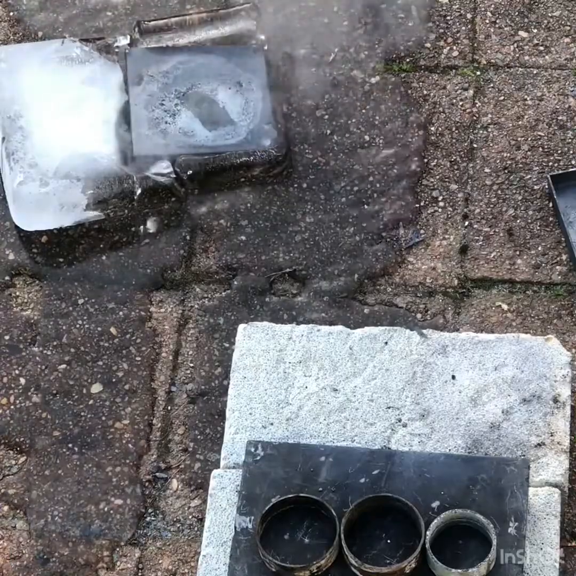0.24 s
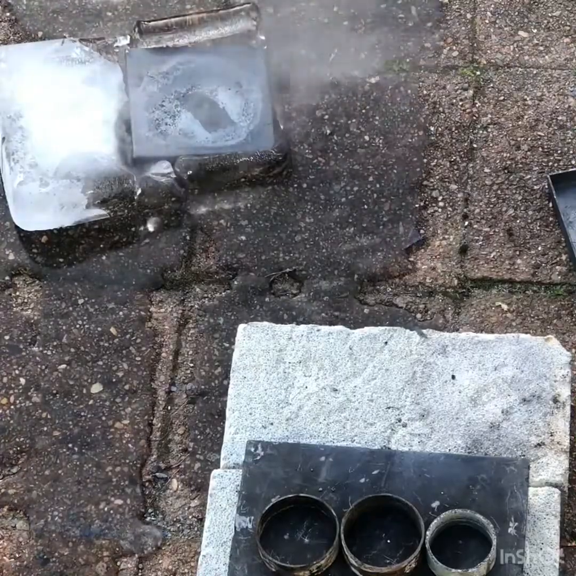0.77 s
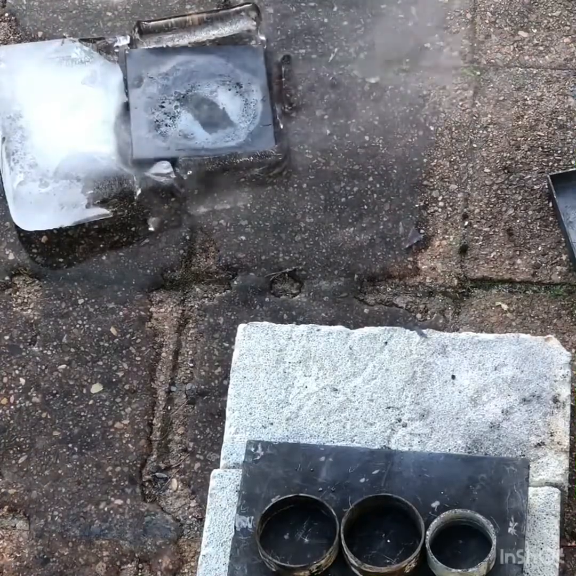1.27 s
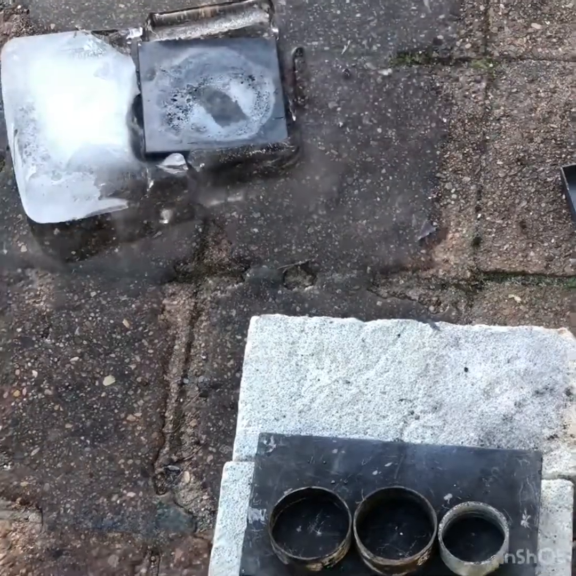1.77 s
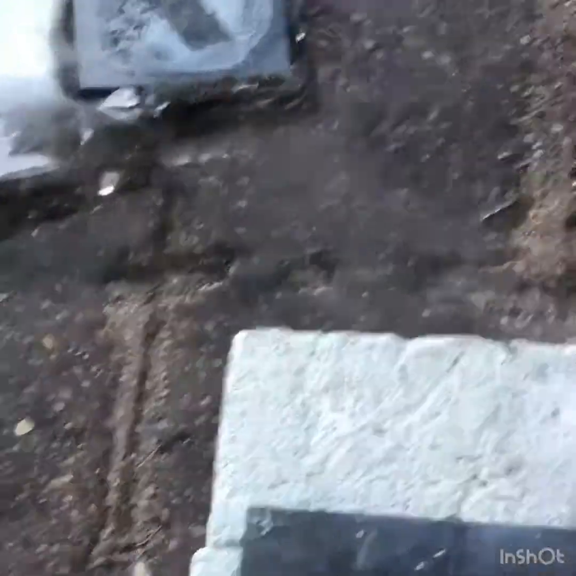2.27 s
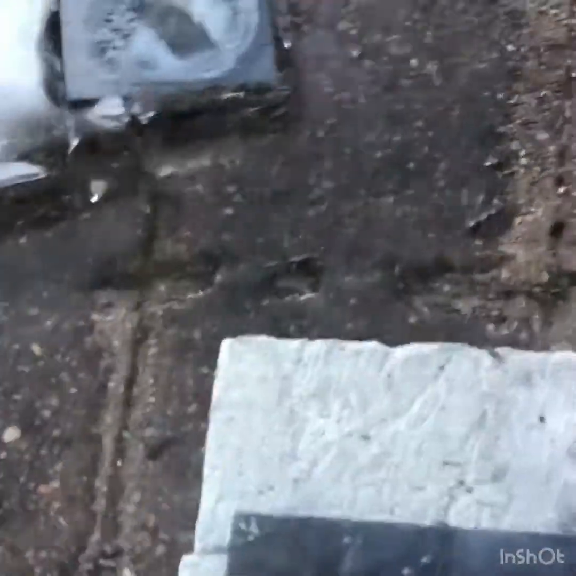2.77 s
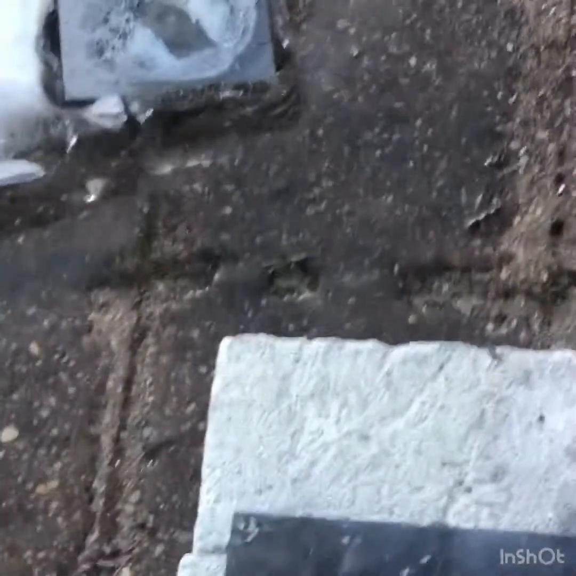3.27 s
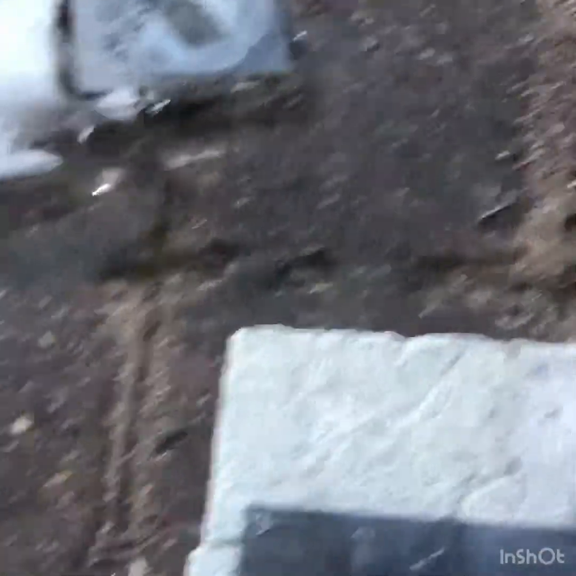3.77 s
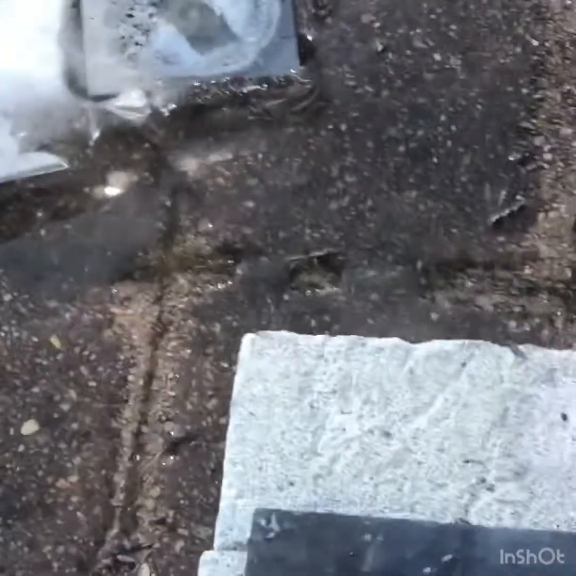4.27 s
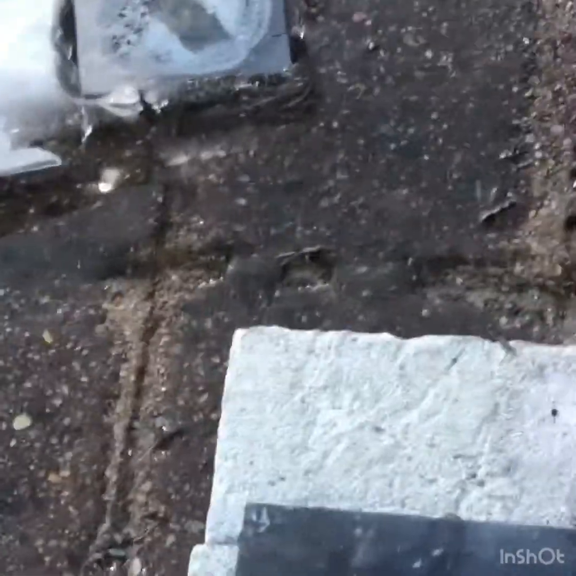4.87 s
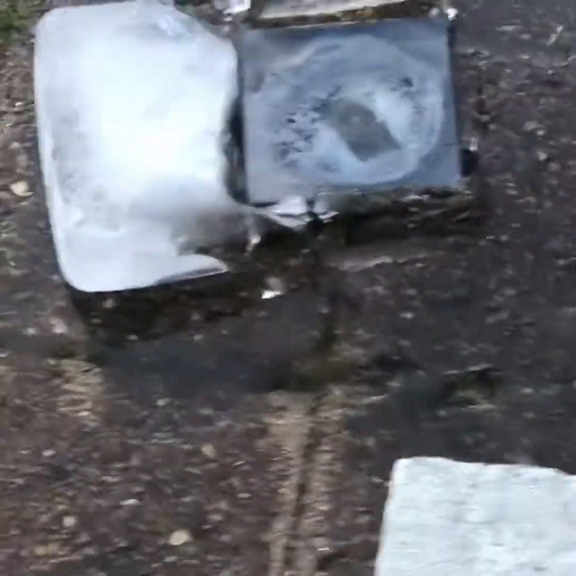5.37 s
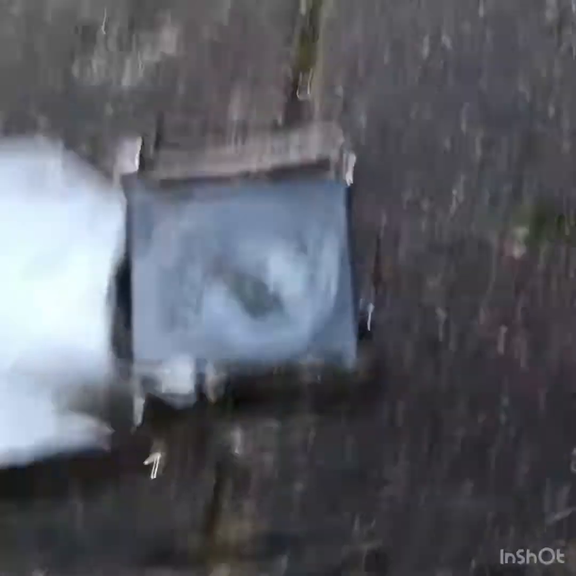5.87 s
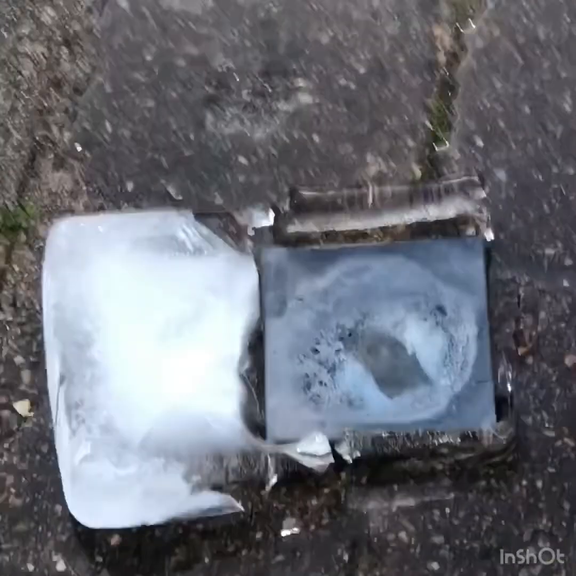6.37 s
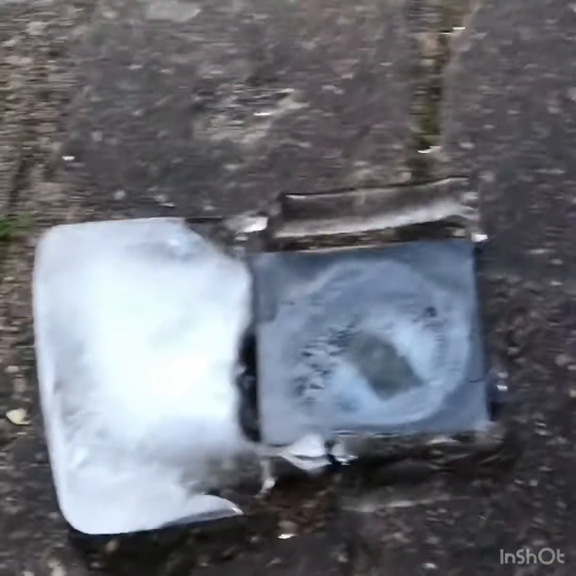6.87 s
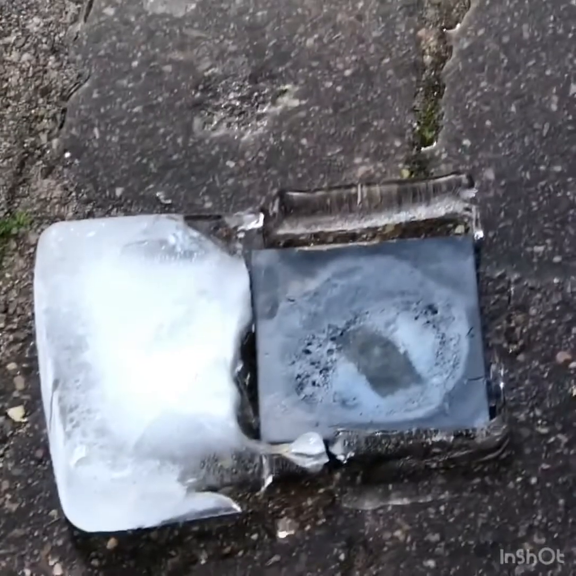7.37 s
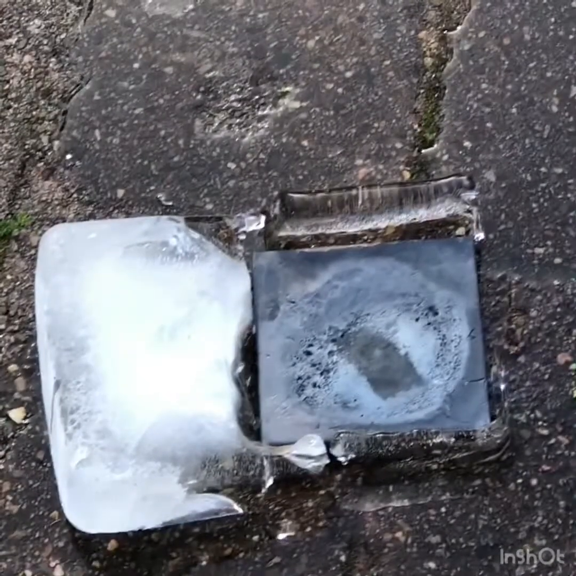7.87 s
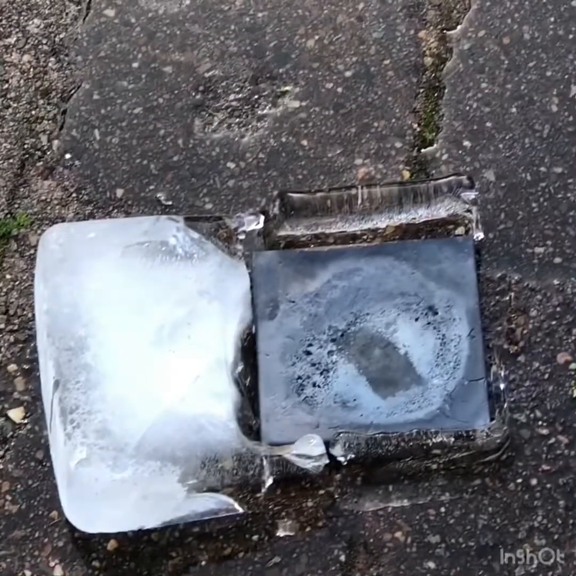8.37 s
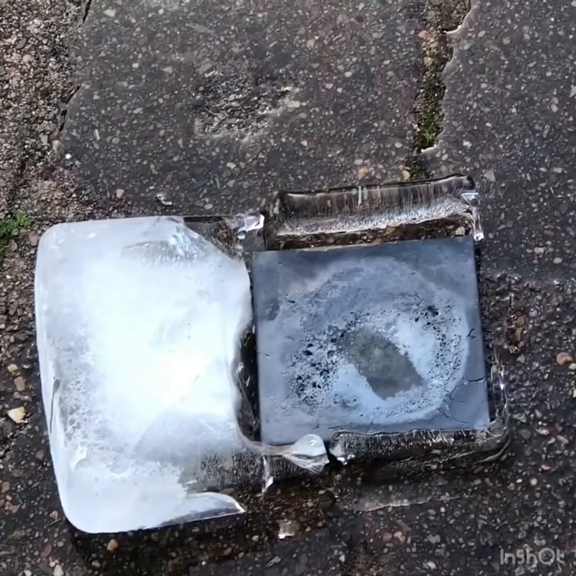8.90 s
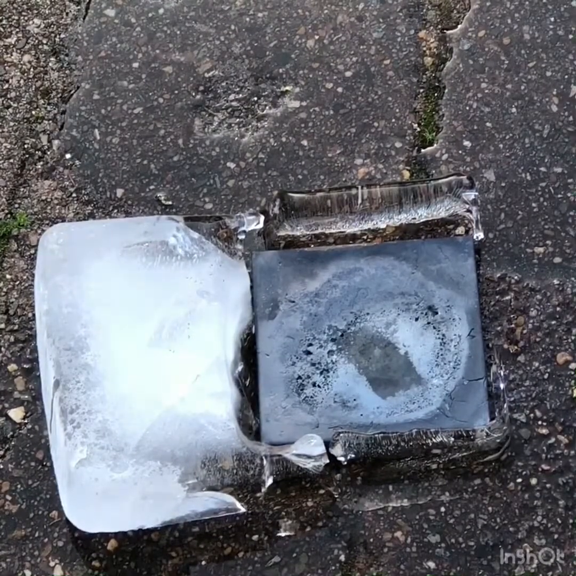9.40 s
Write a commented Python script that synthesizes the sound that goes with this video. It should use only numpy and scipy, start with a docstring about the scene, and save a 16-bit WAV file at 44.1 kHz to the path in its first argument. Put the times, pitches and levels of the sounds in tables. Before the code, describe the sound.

Outdoors, dense steamy sizzling surges after six seconds, then dies away through sharp ice snaps, soft bubbling and small microphone knocks.

```python
"""A hot metal block melts into a slab of ice on a pavement, outdoors, over a drone of distant traffic.
It opens with a steam chirp in a dense boiling hiss: filtered noise and clicks, combed by short echoes.
Spits, plops and ticks (filtered bursts) and thumps on the hand-held microphone follow; engines come and go.
The hiss peaks after 6 s and fades under a burble of low grains; ice snaps, and strains in a run of clicks.
A fine fizz, further soft burbles, and at the end small knocks on the microphone remain."""
import sys
import numpy as np
from scipy import signal
from scipy.fft import rfft, irfft
from scipy.io import wavfile
from scipy.ndimage import uniform_filter1d

SR = 44100
rng = np.random.default_rng(int(sys.argv[2]) if len(sys.argv) > 2 else 0)


def dump(signal):
    """Clip the signal to [-1, 1] and save it as 16-bit WAV at the path in sys.argv[1]."""
    limited = np.clip(np.atleast_2d(signal).T, -1, 1)
    pcm = np.round(limited * 32767).astype(np.int16)
    wavfile.write(sys.argv[1], SR, pcm)


N = 425124

# Distant traffic spectrum: f/Hz, density/dB per Hz
TRAFFIC_SPECTRUM = [(20, -42), (35, -16), (50, 0.5), (85, 0.5), (130, -3.5), (200, -10.5), (350, -11.5),
                    (600, -11), (1100, -16), (3000, -25.5), (15000, -52)]
TRAFFIC_START_DB, TRAFFIC_RISE_DB_PER_S = -50.5, 0.2461  # slowly thickens
# Nearest engine pulls up to speed, then eases off: t/s, pitch f/Hz, level/dB before throb
NEAR_ENGINE = [(1.85, 71, -63), (2.35, 75.7, -46), (2.6, 74.8, -89), (3.0, 79, -49), (3.45, 83.2, -56),
               (3.65, 86.1, -47), (3.9, 88.3, -51), (4.3, 87, -56), (4.6, 88.2, -51), (4.85, 89, -57),
               (5.1, 91.1, -52), (5.55, 92, -47), (5.8, 85.4, -56), (6.0, 73.5, -49), (6.15, 72, -62)]
# Distant engine pulls, each a steady glide: start t/s, length/s, first f/Hz, last f/Hz, level/dB before throb
ENGINES = [(0.198, 0.49, 112, 116.3, -55), (3.7, 1.04, 62.7, 68, -56), (6.301, 0.68, 59.2, 56.7, -50),
           (6.599, .9, 71.9, 77.7, -55), (7.15, 2.0, 50.9, 50.4, -56.5), (7.251, 0.47, 108, 108.6, -48),
           (7.804, 0.84, 88.8, 86.8, -53), (7.85, 2.2, 175.9, 176.6, -62), (8.6, 0.56, 162.3, 157.3, -55),
           (9.248, .5, 69, 61, -55)]
ENGINE_FADE_S = 0.13

# Fingers bump and brush the microphone body: t/s, strength/dB, centre f/Hz, t60/s
BUMPS = [(3.592, -31, 72, 0.22), (3.6, -35.5, 126, .1), (5.808, -27.5, 64.1, 0.3), (5.814, -35, 131, 0.13),
         (6.435, -30, 60, 0.42), (6.46, -34, 105, .2), (9.139, -48, 1300, .03), (9.1457, -36, 1250, 0.04),
         (9.165, -42, 1300, .015), (9.168, -34.5, 620, 0.013), (9.168, -33.5, 310, 0.014),
         (9.167, -40, 160, .025), (9.174, -42.5, 1600, .015), (9.1755, -40, 500, .012),
         (9.19, -44, 700, .12), (9.222, -50, 800, .03), (9.232, -48, 300, .04), (9.248, -46, 900, .015),
         (9.259, -48, 600, .025), (9.27, -45, 550, .025), (9.308, -40, 1350, .008), (9.327, -50, 650, .02)]
BUMP_OCTAVES, BUMP_HIGHPASS_HZ = 0.35, 36

# Soft low burbles: start t/s, length/s, peak level/dB
BURBLES = [(6.1, 0.66, -52.5), (8.08, 0.31, -49.3), (8.38, 0.17, -50.5), (8.56, 0.13, -50.5)]
BURBLE_HZ, BURBLE_SIGMA_OCTAVES = 493, 0.6

# Ring of the straining ice: f/Hz, level/dB
STRAIN_SPECTRUM = [(500, -22), (1200, -12), (2700, -10), (3500, 0), (3900, -2), (4600, -13), (6500, -6),
                   (9000, -10), (14000, -26)]
STRAIN_START_S, STRAIN_LENGTH_S, STRAIN_LAST_DB, STRAIN_GROWTH_DB = 7.128, 0.066, -33, 7

# Steam whistling through a narrow gap: start t/s, length/s, first f/Hz, last f/Hz, level/dB
CHIRPS = [(0.063, .085, 1700, 1590, -41)]
CHIRP_WAVER_RATIO, CHIRP_FLUTTER_DB = 0.02, 3.5  # rms pitch deviation, rms level deviation

# Spitting drops: t/s, strength/dB
SPITS = [(.392, -26), (.525, -29), (.646, -28), (1.009, -35), (1.3735, -29.5), (1.377, -29), (1.381, -29),
         (1.637, -28), (1.677, -27), (2.151, -31), (2.432, -30), (2.573, -29), (2.677, -29), (3.249, -31),
         (6.696, -32), (7.19, -40), (7.742, -42), (7.907, -47), (8.218, -45), (8.593, -50), (9.275, -45),
         (9.289, -44)]
SPIT_HZ, SPIT_OCTAVES, SPIT_T60_S = 7000, 0.6, 0.008
# Dull low pops: large bubbles, and the low body of some ticks and spits: t/s, strength/dB, centre f/Hz
PLOPS = [(.807, -37, 551.3), (1.055, -45, 700), (1.3742, -33, 600), (1.512, -43, 650), (1.639, -36, 850),
         (1.776, -33.5, 650), (2.044, -38, 550), (3.799, -33.5, 900), (4.308, -41, 600), (4.606, -33, 1050),
         (5.762, -47, 702)]
PLOP_OCTAVES, PLOP_T60_S = 1, 0.01
# Ticks of cracking ice; the last three are the bright edge of a knock on the microphone:
# t/s, strength/dB, centre f/Hz
TICKS = [(.808, -35, 3500), (3.7987, -25.5, 2100), (3.801, -31, 2990), (4.606, -26.5, 2000),
         (4.6085, -32, 2890), (4.994, -32, 1400), (5.349, -33, 1506), (7.2042, -34, 1800),
         (7.82, -45, 1800), (7.834, -44, 1600), (8.768, -44, 2200), (9.144, -47, 2200), (9.1475, -43, 2200),
         (9.152, -48, 2000)]
TICK_OCTAVES, TICK_T60_S = 1, 0.0094
# Sharp snaps that ring the ice: t/s, strength/dB, pitch f/Hz, t60/s
SNAPS = [(6.5625, -24, 5450, 0.005), (6.7478, -30, 3990, .012), (7.1898, -30.5, 3600, 0.008),
         (7.2035, -26, 3350, .006), (7.2062, -33, 3500, .014), (8.759, -41, 3930, .012)]
SNAP_OCTAVES = 0.14

# Strength of the boil: t/s, hiss level/dB in HISS_LEVEL_BAND_HZ before tints, flutter and jets
HISS_LEVEL = [(0.0, -26.5), (.55, -28.5), (0.94, -29), (.99, -27.3), (1.23, -27.5), (1.69, -27),
              (1.82, -30), (2.0, -27.5), (2.1, -29.2), (2.55, -27.5), (3.73, -28), (3.94, -29), (4.11, -28),
              (4.45, -30), (4.68, -28), (5.55, -26), (6.12, -26.5), (6.22, -23.5), (6.35, -26),
              (6.56, -27.5), (6.86, -35), (7.3, -37), (7.75, -39), (7.92, -39), (8.06, -43.5),
              (8.15, -39.5), (8.38, -44), (8.5, -42), (8.68, -41.5), (8.86, -43.5), (9.02, -43.5),
              (9.24, -50.5), (9.33, -49), (9.5, -45.5), (9.63, -51.5)]
HISS_LEVEL_BAND_HZ = (4500, 14000)
# Calm of the boil: t/s, 0 (hard boil) to 1 (simmer)
CALM = [(0, 0.05), (4.4, 0.08), (6.3, 0.36), (6.9, 0.54), (7.8, 0.95), (9.0, 0.7)]
# Base spectra of the hard boil, the simmer and the last, dying fizz: f/Hz, density/dB per Hz
BOIL_SPECTRUM = [(80, -33), (150, -9.5), (260, -10.5), (390, -19), (570, -6.5), (760, -9.5), (1050, -4),
                 (1270, -6.5), (1730, -3), (2290, -2.5), (3340, 0), (5240, 1.5), (7280, 7.5), (11200, 8),
                 (13300, 2.5), (15600, -9.5)]
SIMMER_SPECTRUM = [(300, -23.5), (1000, -8.5), (1400, 3), (2200, 0), (2700, -1), (3400, -0.5), (4600, 5.5),
                   (6500, 3), (7300, 8.5), (8400, 7), (10500, 1.5), (13000, -6), (14500, -11), (15600, -34)]
DYING_SPECTRUM = [(300, -25), (1000, -4), (2000, -3), (2700, 6), (3300, -0.5), (4000, 7), (5000, 10),
                  (6300, 2.5), (7500, 2), (8900, 0.5), (10800, -3), (12000, -9), (15600, -18)]
DYING_START_S, DYING_END_S = 9.03, 9.15
# Low resonance of the steam pocket under the block: t/s, f/Hz, height/dB
POCKET_LOW = [(.1, 1630, 0), (.85, 1420, 1), (1.25, 987, -2.5), (2.2, 985, 3), (2.55, 1049, -1),
              (2.9, 1612, 2), (3.5, 1674, 3), (4.5, 1920, 2.5), (6.0, 1814, 3), (7.1, 2130, 4.5),
              (9.64, 2210, 2)]
# Upper resonance, which grows as the pocket deepens: t/s, f/Hz, height/dB
POCKET_HIGH = [(.6, 4300, 1), (1.7, 3500, 4), (2.6, 3230, 1), (5.0, 3048, 5.5), (6.9, 3760, 4.5),
               (8.0, 3400, 6), (9.64, 3330, 14)]
POCKET_LOW_SIGMA_OCTAVES = 0.2
POCKET_HIGH_SIGMA_OCTAVES, POCKET_HIGH_NARROWING = 0.29, 0.71  # share of width lost in a full simmer
# The pavement's echo cancels one band, which rises as the microphone moves in over the block
MOVE_START_S, MOVE_END_S, NULL_SIGMA_OCTAVES = 3.7, 6.2, 0.088
NULL_FAR_HZ, NULL_NEAR_HZ, NULL_FAR_DB, NULL_NEAR_DB = 2034, 2570, 4.5, 2.5
# Fizz and sputter targets, in dB over the middle band, steer the treble and bass shelves
MIDDLE_BAND_HZ, SPUTTER_BAND_HZ, FIZZ_BAND_HZ = (2600, 6800), (900, 2400), (7200, 14000)
# Fizz target before surges: t/s, level/dB over the middle band
FIZZ_LEVEL = [(0, -1.3), (3, -0.9), (4.3, -2.5), (5.4, 3), (5.85, -1), (6.9, 2), (7.9, 3.5), (8.9, 3),
              (9.25, 2.5)]
SPUTTER_BOIL_DB, SPUTTER_SIMMER_ADDED_DB = -9.5, -1
# A run of large bubbles as the boil peaks
HEAVE_CENTRE_S, HEAVE_SIGMA_S, HEAVE_DB = 5.78, 0.6, 2.5
# Surge over the running level: more fizz, less sputter, per dB
SURGE_WINDOW_S, FIZZ_DB_PER_DB, SPUTTER_LOSS_DB_PER_DB = 1.03, 0.39, 0.27
# Passing changes in the hiss colour, each lifting one band: start t/s, end t/s, centre f/Hz, height/dB
TINTS = [(0, .45, 4200, 1.5), (.49, .555, 4400, 7), (0.943, 1.202, 7300, 3), (1.0, 1.14, 10400, 3.5),
         (1.15, 1.72, 6300, 2), (1.602, 3.302, 2740, 1), (1.8, 2.32, 6600, 1.5), (2.899, 3.65, 1710, 2),
         (4.9, 5.45, 3204, 1), (5.248, 5.6, 9640, 0.5), (5.601, 6.15, 3605, 1), (7.8, 8.65, 8200, 2)]
TINT_SIGMA_OCTAVES, TINT_RAMP_S = 0.15, 0.053
FLUTTER_RMS_DB, SIMMER_TREBLE_FLUTTER_RMS_DB, JETS_RMS_DB = 0.33, 1, 0.7  # unevenness of the steam
# Near surfaces that throw the hiss back: delay/ms, level/dB
ECHOES = [(1.3, -47), (2.399, -20.5), (3.9, -29), (6.3, -19.5)]
RECORDER_EDGE_HZ = 15750


def gain_of(db):
    """Decibels to amplitude."""
    return 10 ** (np.asarray(db) / 20)


def evened(x):
    """Scales to rms 1."""
    return x / np.sqrt(np.mean(x ** 2) + 1e-20)


def spectrum_db(points, hz):
    """Interpolates a spectrum in dB along log frequency."""
    point_hz, point_db = np.transpose(points)
    return np.interp(np.log(hz + 1), np.log(point_hz + 1), point_db)


def follow(rows, t_s):
    """Interpolates every column of a time curve."""
    row_s, *columns = np.transpose(rows)
    return [np.interp(t_s, row_s, column) for column in columns]


def hump(hz, centre_hz, sigma_octaves):
    """A bell of height 1 on a log-frequency axis."""
    octaves_off = np.log2((hz + 1) / centre_hz)
    return np.exp(-0.5 * (octaves_off / sigma_octaves) ** 2)


def band_level_db(colour_db, hz, band_hz):
    """Power that a spectrum holds between two frequencies, frame by frame."""
    low_hz, high_hz = band_hz
    power = gain_of(colour_db) ** 2 * (hz > low_hz) * (hz < high_hz)
    return 10 * np.log10(power.mean(0))


def wander(shape, size):
    """Noise smoothed twice along the last axis, rms 1."""
    smoothed = uniform_filter1d(rng.standard_normal(shape), size)
    return evened(uniform_filter1d(smoothed, size))


def add(mix, start_s, sound):
    """Mixes a sound in at its start time."""
    part = mix[max(round(start_s * SR), 0):][:len(sound)]
    part += sound[:len(part)]


def drone(hz, level_db):
    """One engine's firing tone: a sine with slight waver in pitch and throb in level."""
    waver, throb = wander((2, N), size=4000)[:, :len(hz)]
    phase = 2 * np.pi * np.cumsum(hz * (1 + 0.0075 * waver)) / SR
    return evened(np.sin(phase)) * gain_of(level_db + 1.1 * throb)


def outdoors():
    """Distant traffic as a low wash of shaped noise, out of which engine tones rise and sink."""
    hz = np.fft.rfftfreq(N, 1 / SR)
    wash = irfft(rfft(rng.standard_normal(N)) * gain_of(spectrum_db(TRAFFIC_SPECTRUM, hz)), N)
    out = evened(wash) * gain_of(TRAFFIC_START_DB + TRAFFIC_RISE_DB_PER_S * np.arange(N) / SR)
    near_start_s, near_end_s = NEAR_ENGINE[0][0], NEAR_ENGINE[-1][0]
    near_hz, near_db = follow(NEAR_ENGINE, np.arange(near_start_s, near_end_s, 1 / SR))
    add(out, near_start_s, drone(near_hz, near_db))
    for start_s, length_s, first_hz, last_hz, level_db in ENGINES:
        t_s = np.arange(0, length_s, 1 / SR)
        fade = np.minimum(np.minimum(t_s, length_s - t_s) / ENGINE_FADE_S, 1)
        glide_hz = first_hz + (last_hz - first_hz) * t_s / length_s
        add(out, start_s, fade * drone(glide_hz, level_db))
    return out


def pops(rows, rough_s, top_hz):
    """A sharp push and dying splutter excite one broad resonance; strength is energy as rms over 5 ms."""
    out, t_s = np.zeros(N), np.arange(16384) / SR
    hz = np.fft.rfftfreq(len(t_s), 1 / SR)
    treble_loss = 1 / np.sqrt(1 + (hz / top_hz) ** 10)
    for start_s, strength_db, centre_hz, octaves, t60_s in rows:
        push = rng.standard_normal(len(t_s)) * np.exp(-np.log(1000) * t_s / t60_s)
        push *= (t60_s / rough_s) / np.linalg.norm(push)  # longer pops splutter more
        push[0] += 1
        ratio = (hz + 1) / centre_hz
        resonance = 1 / (1 + 1j * (ratio - 1 / ratio) / (2 * octaves))
        pop = irfft(rfft(np.roll(push, 16)) * resonance ** 2 * treble_loss)
        unit_pop = pop / np.linalg.norm(pop) * np.sqrt(0.005 * SR)
        add(out, start_s, gain_of(strength_db) * unit_pop)
    return out


def handling():
    """Dull thumps and small knocks on the microphone body, as high-passed resonant pops."""
    rows = [(s, db, hz, BUMP_OCTAVES, t60_s) for s, db, hz, t60_s in BUMPS]
    knocks = pops(rows, rough_s=0.026, top_hz=2180)
    highpass = signal.butter(4, BUMP_HIGHPASS_HZ, "high", fs=SR, output="sos")
    return signal.sosfilt(highpass, knocks)


def bursts(per_s, spread_db, steam):
    """Bursts as clicks, most tiny and a few large, in smooth noise."""
    size = gain_of(spread_db * np.minimum(rng.exponential(1, N), 6))  # largest are limited
    clicks = size * rng.choice([-1, 1], N) * (rng.random(N) < per_s / SR)
    return evened(evened(clicks) + steam * rng.standard_normal(N))


def burble():
    """Low, grainy rumble: bursts through one low band, swelling and sinking."""
    grains = rfft(bursts(per_s=400, spread_db=1.5, steam=1.1))
    band = hump(np.fft.rfftfreq(N, 1 / SR), BURBLE_HZ, BURBLE_SIGMA_OCTAVES)
    rumble = evened(irfft(grains * band, N))
    swell = np.zeros(N)
    for start_s, length_s, peak_db in BURBLES:
        progress = np.arange(0, 1, 1 / (length_s * SR))
        add(swell, start_s, gain_of(peak_db) * np.sqrt(np.sin(np.pi * progress).clip(0)))
    return rumble * swell


def strain():
    """The ice strains in a swelling run of tiny fractures that ring it, until it snaps."""
    fractures = rfft(bursts(per_s=1500, spread_db=0.5, steam=0.5))
    ring = irfft(fractures * gain_of(spectrum_db(STRAIN_SPECTRUM, np.fft.rfftfreq(N, 1 / SR))), N)
    out, progress = np.zeros(N), np.arange(0, 1, 1 / (STRAIN_LENGTH_S * SR))
    growth = gain_of(STRAIN_LAST_DB - STRAIN_GROWTH_DB * (1 - progress))
    add(out, STRAIN_START_S, evened(ring[:len(progress)]) * growth)
    return out


def chirps():
    """Steam whistles as gliding sines, unsteady in pitch and level."""
    out = np.zeros(N)
    for start_s, length_s, first_hz, last_hz, level_db in CHIRPS:
        progress = np.arange(0, 1, 1 / (length_s * SR))
        waver, flutter = wander((2, SR), size=120)[:, :len(progress)]
        hz = (first_hz + (last_hz - first_hz) * progress) * (1 + CHIRP_WAVER_RATIO * waver)
        swell = np.sqrt(np.sin(np.pi * progress ** 1.8).clip(0))
        swell = swell * gain_of(CHIRP_FLUTTER_DB * flutter)
        whistle = np.sin(2 * np.pi * np.cumsum(hz) / SR)
        add(out, start_s, gain_of(level_db) * evened(swell * whistle))
    return out


def crackle():
    """Resonant pops: bright water spits, dull low plops, thin ticks and ringing ice snaps."""
    spits = [(s, db, SPIT_HZ, SPIT_OCTAVES, SPIT_T60_S) for s, db in SPITS]
    plops = [(s, db, hz, PLOP_OCTAVES, PLOP_T60_S) for s, db, hz in PLOPS]
    ticks = [(s, db, hz, TICK_OCTAVES, TICK_T60_S) for s, db, hz in TICKS]
    snaps = [(s, db, hz, SNAP_OCTAVES, t60_s) for s, db, hz, t60_s in SNAPS]
    out = pops(spits, rough_s=0.0093, top_hz=11000)
    out += pops(plops, rough_s=0.02, top_hz=2500)
    out += pops(ticks, rough_s=0.012, top_hz=5500)
    out += pops(snaps, rough_s=0.014, top_hz=11000)
    return out


def base_colour(hz, t_s, calm):
    """Boil-to-simmer-to-dying spectrum in dB, with the pocket's resonances and the pavement's null."""
    colour = (1 - calm) * spectrum_db(BOIL_SPECTRUM, hz) + calm * spectrum_db(SIMMER_SPECTRUM, hz)
    dying = np.clip((t_s - DYING_START_S) / (DYING_END_S - DYING_START_S), 0, 1)
    colour += (spectrum_db(DYING_SPECTRUM, hz) - colour) * dying
    low_hz, low_db = follow(POCKET_LOW, t_s)
    colour += low_db * hump(hz, low_hz, POCKET_LOW_SIGMA_OCTAVES)
    high_hz, high_db = follow(POCKET_HIGH, t_s)
    high_width = POCKET_HIGH_SIGMA_OCTAVES * (1 - POCKET_HIGH_NARROWING * calm)
    colour += high_db * hump(hz, high_hz, high_width)
    move = [(MOVE_START_S, NULL_FAR_HZ, NULL_FAR_DB), (MOVE_END_S, NULL_NEAR_HZ, NULL_NEAR_DB)]
    null_hz, null_db = follow(move, t_s)
    return colour - null_db * hump(hz, null_hz, NULL_SIGMA_OCTAVES)


def sizzle():
    """Coarse and fine bubble bursts in steam, coloured by boil strength, steam pocket and tints."""
    hz, t_s, fine = signal.stft(bursts(per_s=5000, spread_db=1.5, steam=1.27), SR, nperseg=512, noverlap=384)
    coarse = signal.stft(bursts(per_s=900, spread_db=1.0, steam=1.29), SR, nperseg=512, noverlap=384)[2]
    hz = hz[:, None]
    low = 1 / (1 + (hz / 2500) ** 8)  # large bubbles sound below this
    high = 1 - 1 / (1 + (hz / 7000) ** 10)  # the finest above this
    level_db = follow(HISS_LEVEL, t_s)[0]
    calm = np.clip(follow(CALM, t_s)[0], 0, 1)
    colour = base_colour(hz, t_s, calm)

    # bubbles get finer in every surge
    surge_db = level_db - uniform_filter1d(level_db, round(SURGE_WINDOW_S / t_s[1]))
    heave = np.exp(-0.5 * ((t_s - HEAVE_CENTRE_S) / HEAVE_SIGMA_S) ** 2)
    sputter_db = SPUTTER_BOIL_DB + SPUTTER_SIMMER_ADDED_DB * calm + HEAVE_DB * heave
    sputter_db -= SPUTTER_LOSS_DB_PER_DB * surge_db
    fizz_db = follow(FIZZ_LEVEL, t_s)[0] + FIZZ_DB_PER_DB * surge_db
    middle_now_db = band_level_db(colour, hz, MIDDLE_BAND_HZ)
    sputter_now_db = band_level_db(colour, hz, SPUTTER_BAND_HZ)
    fizz_now_db = band_level_db(colour, hz, FIZZ_BAND_HZ)
    colour += low * (sputter_db - sputter_now_db + middle_now_db)
    colour += high * (fizz_db - fizz_now_db + middle_now_db)
    colour += level_db - band_level_db(colour, hz, HISS_LEVEL_BAND_HZ)

    for start_s, end_s, centre_hz, height_db in TINTS:
        ramp = np.clip(np.minimum(t_s - start_s, end_s - t_s) / TINT_RAMP_S, 0, 1)
        colour += height_db * hump(hz, centre_hz, TINT_SIGMA_OCTAVES) * ramp
    # uneven steam: a shared flutter, and brief jets local in frequency
    jets = evened(uniform_filter1d(wander(colour.shape, size=14), size=4, axis=0))
    flutter_db = FLUTTER_RMS_DB + SIMMER_TREBLE_FLUTTER_RMS_DB * calm * high
    colour += flutter_db * wander(len(t_s), size=13) + JETS_RMS_DB * jets
    bubbles = np.sqrt(low) * coarse + np.sqrt(1 - low) * fine
    return signal.istft(bubbles * gain_of(colour), nperseg=512, noverlap=384)[1][:N]


def reflected(x, sway):
    """Short echoes comb the hiss; the comb drifts as the hand sways."""
    n = np.arange(N)
    drift = 1 + sway * wander(N, size=40000)
    echoes = sum(gain_of(db) * np.interp(n - ms * drift * SR / 1000, n, x) for ms, db in ECHOES)
    return evened(x + echoes) * np.std(x)


def scene():
    """Sums all sources; both channels are alike."""
    mono = outdoors() + handling() + burble() + strain() + chirps() + crackle()
    mono += reflected(sizzle(), sway=0.0345)
    return np.array([mono, mono])


def record(dry):
    """The recorder's band limit: a linear-phase low-pass."""
    lowpass = signal.firwin(511, RECORDER_EDGE_HZ, window=("kaiser", 9), fs=SR)
    return signal.oaconvolve(dry, lowpass[None], "same")


dry = scene()
out = record(dry)
dump(out)
```